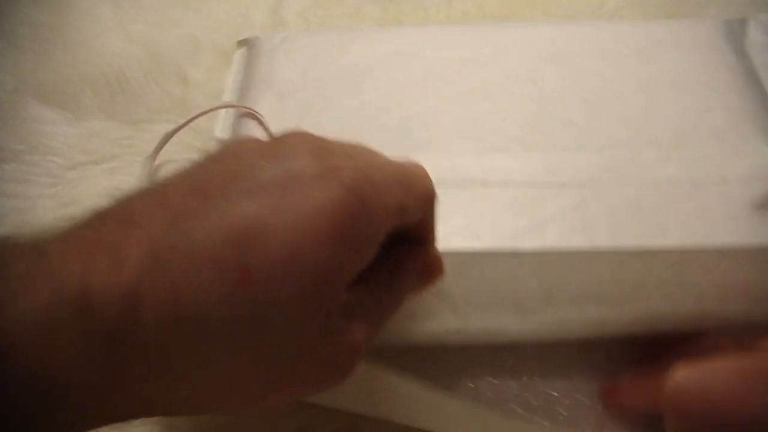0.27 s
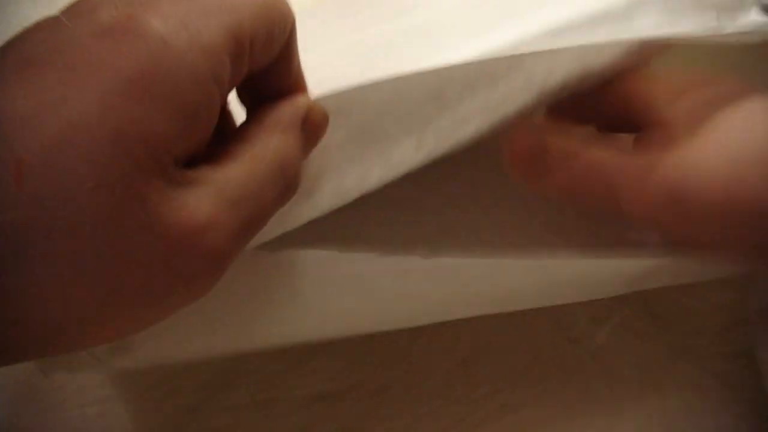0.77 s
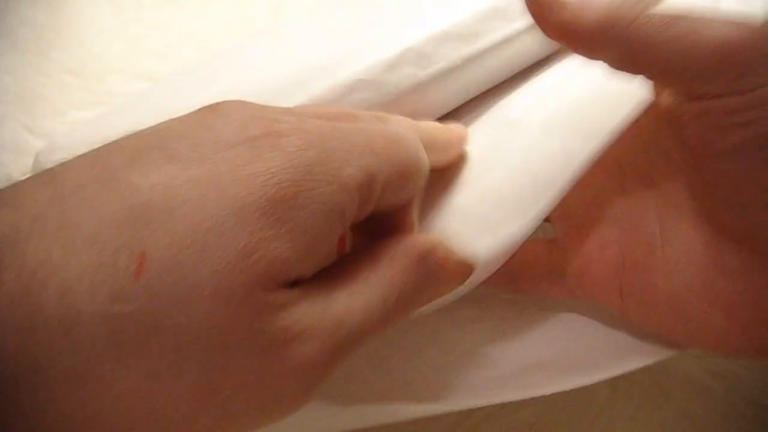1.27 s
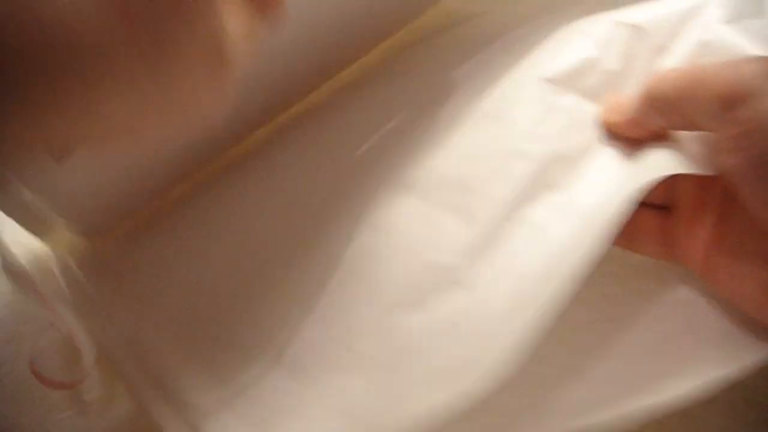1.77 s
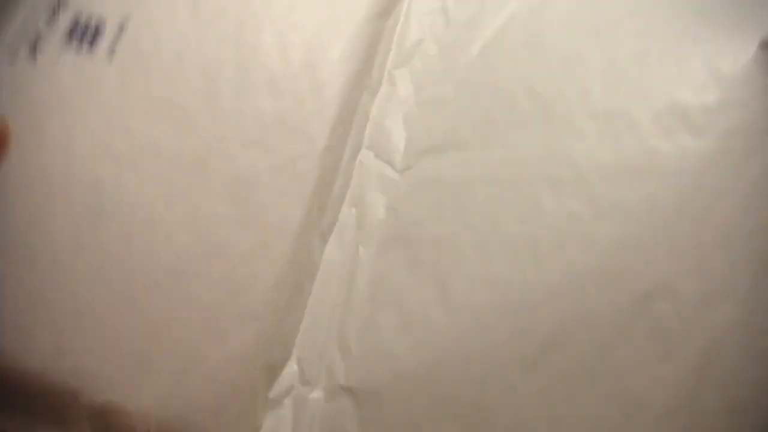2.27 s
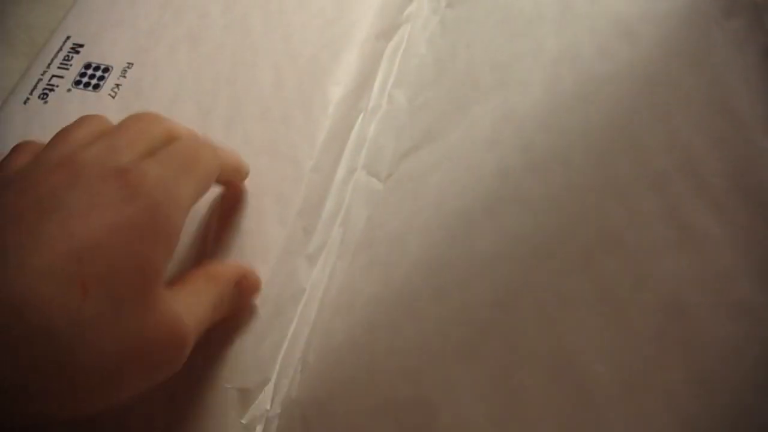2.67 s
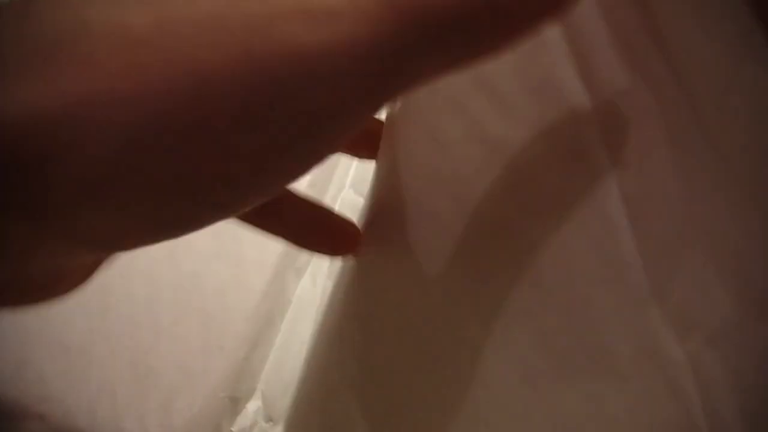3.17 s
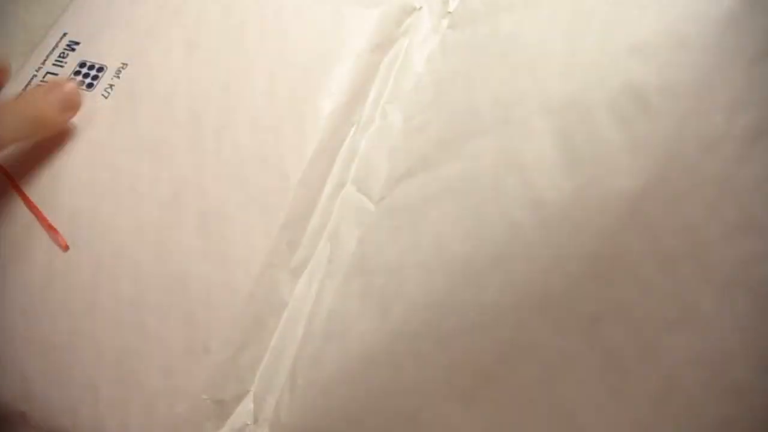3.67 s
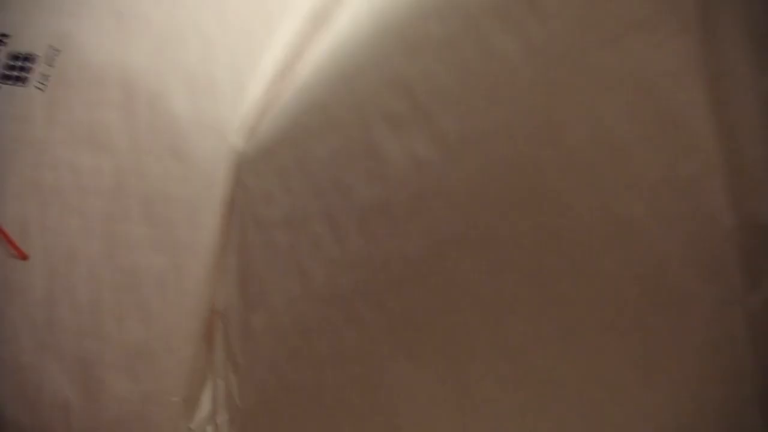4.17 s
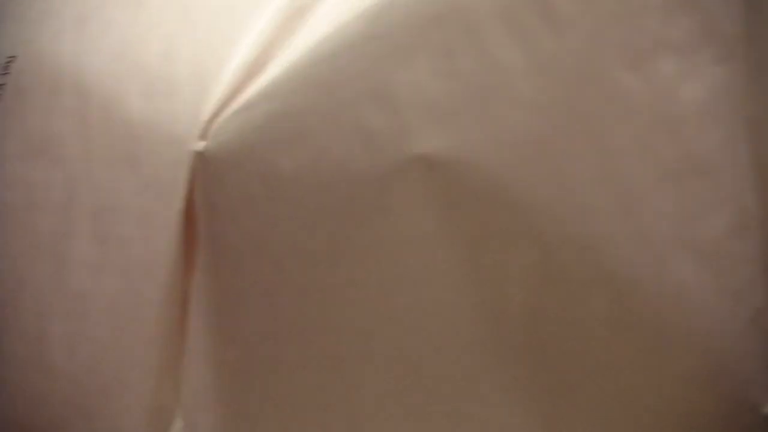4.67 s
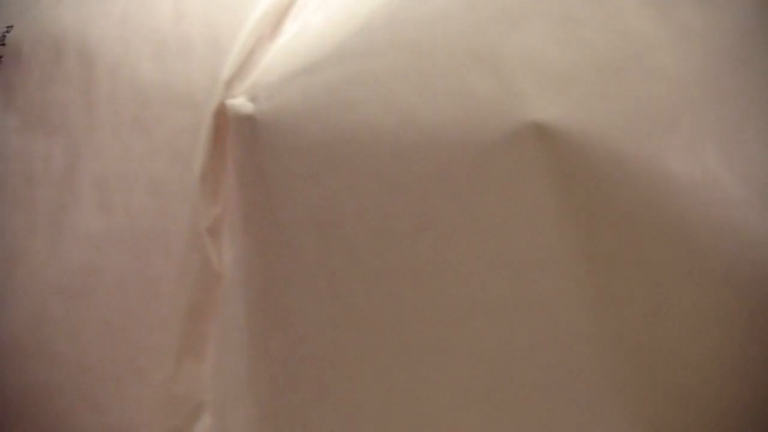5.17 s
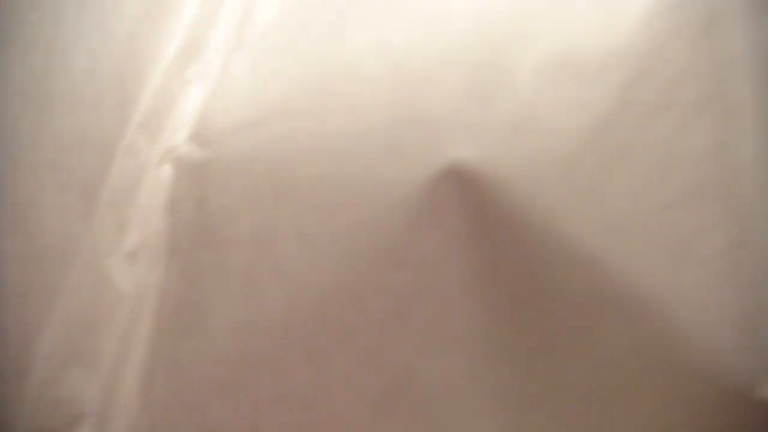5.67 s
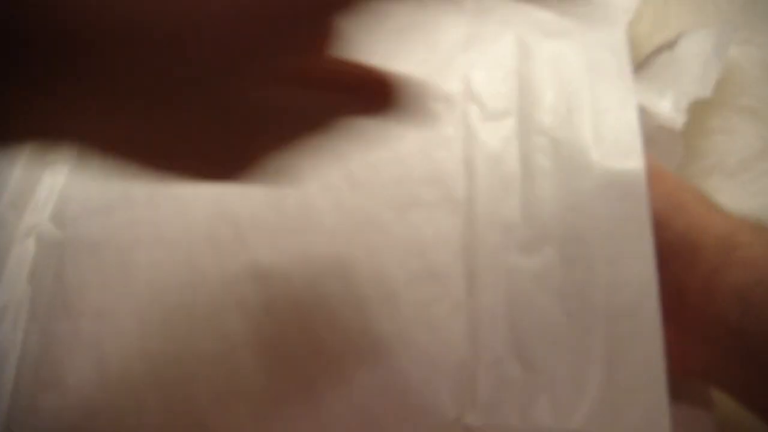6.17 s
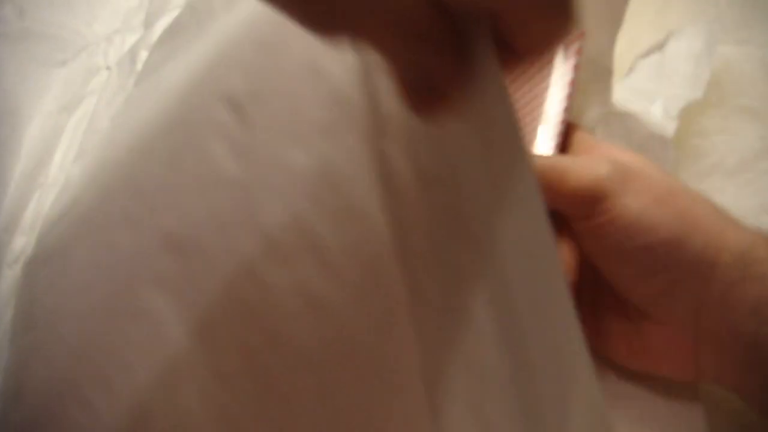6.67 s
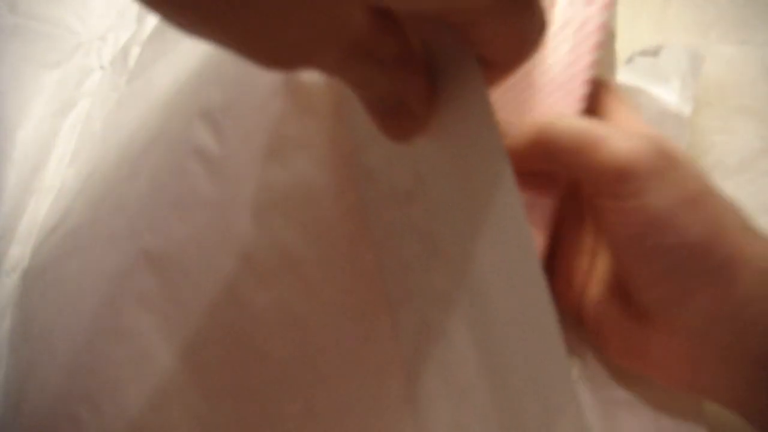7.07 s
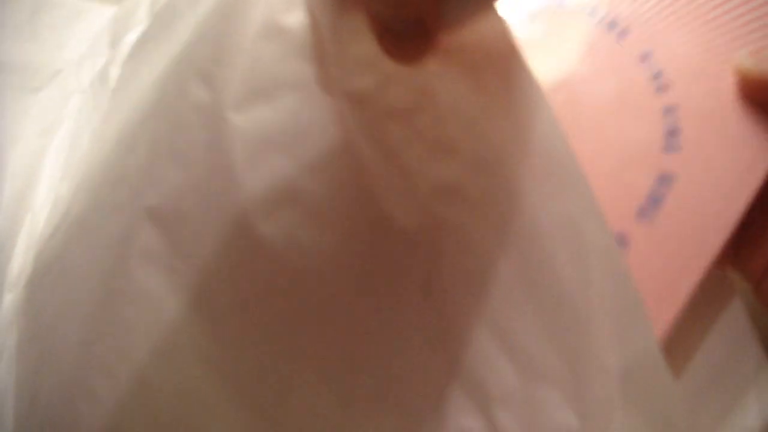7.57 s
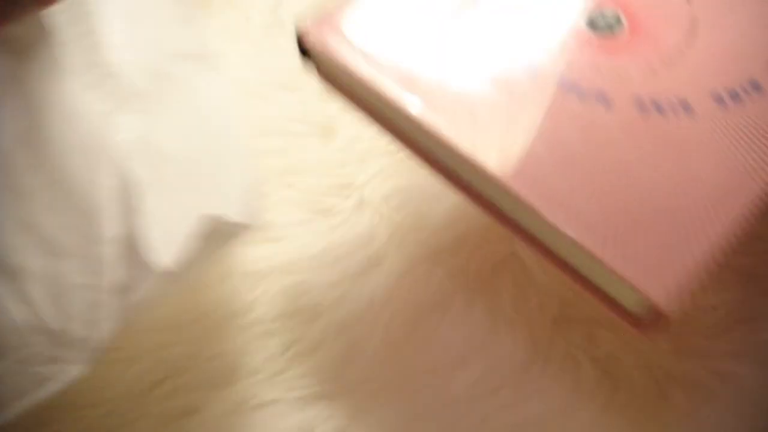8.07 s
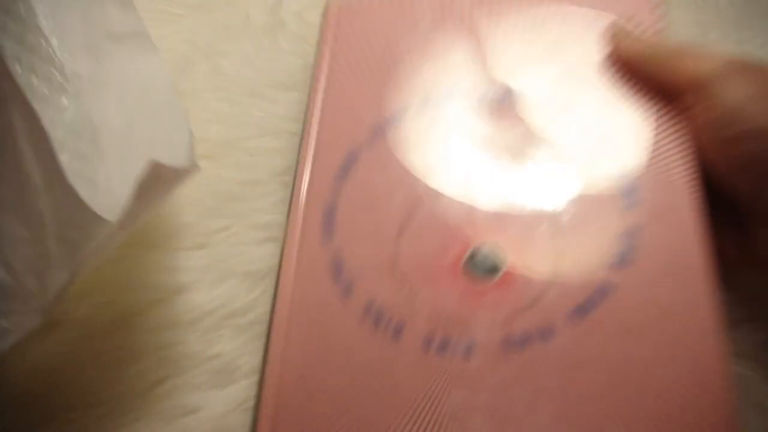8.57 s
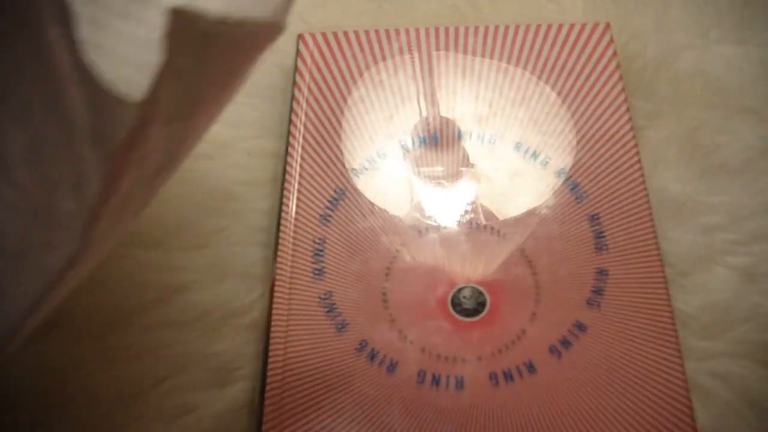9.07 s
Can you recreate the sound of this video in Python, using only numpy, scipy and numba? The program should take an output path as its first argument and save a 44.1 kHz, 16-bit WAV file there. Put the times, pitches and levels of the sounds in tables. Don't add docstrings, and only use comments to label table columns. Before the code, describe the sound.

Hands tear open and empty a padded paper envelope very close to the microphone, loud sharp crackles over dense crinkling, then near silence.

```python
import sys
import numpy as np
from scipy import signal
from scipy.fft import rfft, irfft
from scipy.io import wavfile
from scipy.ndimage import uniform_filter1d
from numba import njit

SR = 44100
rng = np.random.default_rng(int(sys.argv[2]) if len(sys.argv) > 2 else 0)


def dump(signal):
    limited = np.clip(np.atleast_2d(signal).T, -1, 1)
    pcm = np.round(limited * 32767).astype(np.int16)
    wavfile.write(sys.argv[1], SR, pcm)


def linear_from_db(decibels):
    return 10 ** (np.asarray(decibels, float) / 20)


N = 411894

# time in seconds, crinkle level in dB.
REST = [(0, -21.5), (.67, -26), (1.26, -29), (1.5, -28), (2.2, -26.5), (2.72, -30), (3.2, -25.5),
        (4.86, -25), (5.19, -27), (5.42, -19), (5.9, -18.5), (5.99, -33), (6.4, -40), (7.0, -36.5),
        (7.3, -25), (7.9, -25.5), (7.97, -40), (9.34, -41.5)]
REST_PANEL_DB, REST_FLAP_DB = -11, -26
# start in seconds, held for seconds, crinkle level in dB, panels minus crinkle in dB.
GRIPS = [(.1, 0.016, -18, -9), (.3, .27, -27, -13), (.62, 0.0054, -23.5, -15), (.71, 0.23, -21.5, -13.5),
         (0.898, 0.17, -21, -10.5), (1.203, 0.011, -21, -6.5), (1.39, 0.0068, -16.5, -8.5),
         (1.52, 0.076, -30.5, -4), (1.93, 0.14, -23.5, -7.5), (2.35, .25, -26.5, -11.5),
         (2.901, 0.028, -15.5, -9.5), (3.04, 0.06, -17.5, -11), (3.35, 0.27, -22.5, -6),
         (3.9, 0.0082, -19, -9.5), (4.14, 0.089, -19.5, -10.5), (4.35, .4, -22.5, -11),
         (5.02, 0.0036, -18.5, -10), (5.35, 0.013, -17, -9), (5.47, 0.15, -29, 1.5), (6.1, 0.025, -29, -9),
         (6.551, 0.022, -19.5, -8.5), (6.67, 0.035, -16.5, -9.5), (6.8, 0.11, -27, -20),
         (7.12, 0.013, -22.5, -9), (7.27, 0.18, -23, -4), (7.679, 0.0034, -20, -8), (8.07, 0.22, -36, -9),
         (8.66, 0.0082, -39.5, -4), (9.03, 0.039, -44, -4)]
GRIP_RISE_DB_S, GRIP_FALL_DB_S = 135, 147
# start in seconds, held for seconds, level in dB.
FLAPS = [(.12, 0.086, -41.5), (.81, 0.35, -39.5), (1.38, 0.055, -34), (1.89, 0.074, -55),
         (2.57, 0.0085, -38), (2.86, 0.07, -37.5), (3.1, 0.44, -42.5), (3.56, 0.035, -38), (4.04, .02, -45),
         (4.44, .02, -38.5), (4.6, 0.45, -50), (5.35, 0.45, -32.5), (6.56, 0.19, -39.5), (7.3, 0.19, -35.5),
         (7.7, 0.02, -37.5)]
FLAP_RISE_DB_S, FLAP_FALL_DB_S = 106, 114
# start in seconds, length in seconds, level change in dB.
PAUSES = [
    (1.223, 0.069, -7.5),
    (1.453, 0.027, -6.5),
    (5.173, 0.064, -5.5),
    (2.965, 0.051, -5.5),
]
PAUSE_EDGE_S = 0.004

# lowest frequency in Hz, highest frequency in Hz.
BANDS = [(2500, 14500), (500, 2500), (40, 500)]
# frequency in Hz, density in dB per Hz.
PAPER = [(50, -6.5), (150, -9), (400, 2.5), (550, -14.5), (800, -11.5), (1500, -8.5), (3000, -5),
         (6000, -3.5), (10000, -2.5), (14500, -8)]

# time in
# seconds, crack level in dB, strongest panel in Hz.
CRACKS = [(.146, 4.5, 3050), (.2483, 7.5, 6380), (.3322, 4, 2476), (.5836, .5, 8000), (.6852, -19, 7600),
          (.8066, 4, 10800), (.963, 1, 9700), (1.2785, 1, 4000), (1.3557, 1, 2840), (1.3826, 5, 4500),
          (1.4955, -4.5, 4500), (1.6484, 2, 3950), (1.801, -1.5, 3500), (2.8922, 0, 3470),
          (3.047, 5.5, 4700), (1.3423, -2, 6230), (4.4917, -2.5, 4530), (5.3505, 2.5, 3400),
          (5.4575, 8.5, 3050), (5.485, 4.5, 3060), (5.5366, 3.5, 1880), (5.6226, 6.5, 2510),
          (5.748, 3, 4570), (5.8645, -2, 3330), (6.8643, -3.5, 7160), (7.2209, 2.5, 4060),
          (7.349, 8.5, 7200), (7.481, 5, 2480), (7.5022, -16, 824), (8.7135, -9.5, 10300)]
# time in seconds, crack level
# in dB, strongest panel in Hz.
FOLDS = [(.8819, 1.5, 3480), (1.0868, 4.5, 6330), (2.4533, -2, 2840), (2.573, 0.5, 4150),
         (2.602, 9.5, 1170), (2.8042, 6, 1250), (3.1592, -15, 3350), (3.2146, -4.5, 3400), (3.5647, 4, 760),
         (4.146, -5, 3530), (4.428, 4.5, 910), (4.7472, 4, 1570), (4.9057, 4.5, 5700), (5.0214, 7, 5100),
         (5.2445, -3.5, 3380), (5.6424, -1, 2850), (5.7075, 4, 1250), (5.8873, 4, 2170), (6.4965, 4, 3670),
         (6.5414, 5, 2050), (6.7518, 6.5, 870), (6.9275, -3, 2600), (7.258, 3.5, 3700), (7.2902, 5.5, 1310),
         (7.4306, 2.5, 5140), (7.445, 3, 810)]
# time in seconds, crack level in dB, strongest panel in Hz.
POPS_OPENING = [(.0184, -18, 10300), (.1277, 6, 2430), (.3872, 9.5, 3550), (.4528, -4, 1860),
                (.5474, -5, 4930), (.792, -0.5, 1260), (.9213, 1, 2850), (1.0168, 4.5, 7900),
                (1.2076, 6.5, 2450), (1.4284, -1, 2480), (1.4402, 5.5, 3100), (1.5565, -1.5, 1230),
                (1.896, -1.5, 1480), (1.9523, .5, 1780), (2.0898, -5.5, 3050), (2.478, 4.5, 1980),
                (3.0957, 3.5, 2730), (3.1825, 2, 2030), (3.2737, 1, 4870), (3.3465, 2, 5700),
                (3.4071, -1.5, 1890), (3.6091, -1.5, 1058), (4.0099, 8, 2170), (4.0588, -6.5, 860),
                (4.0713, 2, 1990), (4.152, 4, 2100), (4.336, 1, 3900)]
# time in seconds, crack level in dB, strongest panel in Hz.
POPS_EMPTYING = [(5.01, 6.5, 2460), (5.0988, 0, 3570), (5.2712, 1.5, 2200), (5.7291, -2, 1590),
                 (5.8276, 5, 2730), (5.905, 2.5, 2330), (6.377, -18, 7500), (6.4317, -19, 1580),
                 (6.4481, -9.5, 2470), (6.6371, 1.5, 1330), (6.67, 2, 2320), (6.6819, 4.5, 6570),
                 (6.7155, 5.5, 1230), (6.855, -7.5, 1380), (7.0055, -4.5, 3100), (7.0963, 0, 2080),
                 (7.2123, 5, 4440), (7.35, -1, 1360), (7.3817, 0, 1270), (7.4058, 5, 1700),
                 (7.5229, 0, 930), (7.5338, 1.5, 2430), (7.572, 4, 1180), (7.6828, 2, 2480),
                 (7.7053, -2.5, 2600), (7.827, -10, 1850), (7.8994, -10, 1410), (8.356, -10, 6740)]
CRACK_PANEL_DB, FOLD_PANEL_DB, POP_PANEL_DB = -7.5, -5.5, 1

# time in seconds, level in dB, leading panel in Hz.
TICKS = [(0.094, -6, 2650), (0.195, -12.5, 670), (0.261, -4.5, 2600), (0.621, -12.5, 1430),
         (0.817, -4, 4970), (0.937, -8, 9600), (1.042, -8, 9560), (1.292, -10, 4500), (1.303, -5, 4160),
         (1.363, -8, 2900), (1.399, 6.5, 8790), (1.85, -19, 666), (1.965, -2.5, 6100), (2.066, -15, 1270),
         (2.856, -8.5, 1340), (2.896, 1.5, 3530), (3.058, -3, 2960), (2.31, -18.5, 1240), (3.318, -16, 775),
         (4.076, -2, 3570), (4.691, -11, 8900), (4.765, -9, 1720),
         (5.092, -9.5, 2620), (5.367, -13, 830), (5.38, -4.5, 3440), (5.458, -15, 2920),
              (5.623, 2, 7300), (5.756, -2, 4800), (6.138, -23, 1380), (6.555, -7, 1880),
              (6.689, -13, 6740), (6.775, -10.5, 795), (7.128, -15.5, 1150), (7.272, -9.5, 1480),
              (7.36, -8, 1300), (7.398, -9, 1160), (7.727, -6.5, 2580), (8.93, -37, 1400),
         (0.737, -12.5, 1800),
    (0.763, -13, 1160),
    (4.269, -18, 1690),
    (4.652, -15.5, 756),
    (5.079, -14, 805),
    (8.046, -29.5, 840),
    (8.263, -34, 1030),
    (8.607, -36, 796),
    (8.673, -32, 2640),
]
# time in seconds, level in dB, pitch in Hz.
THUMPS = [(0.1, -24, 265), (0.788, -26.5, 264), (0.967, -36, 119.5), (1.206, -30.5, 122), (1.432, -32, 280),
          (2.47, -28, 254), (2.608, -21, 277), (2.917, -38, 72.7), (3.555, -23, 234), (4.001, -38, 231),
          (4.451, -35, 140), (5.36, -27, 229), (6.674, -35, 272), (7.666, -20, 263), (7.807, -33, 201)]
# start in seconds, number of ticks, first rate per second,
# last rate per second, unevenness from 0 to 1, panel in Hz, level in dB.
ZIPS = [
    (.686, 14, 290, 290, .2, 7900, -8),
    (1.581, 5, 76, 88, .01, 3800, -6),
    (1.651, 8, 98, 128, .02, 3800, -8),
]

# time in seconds, resonance level in dB.
POCKET = [
    (0, -18),
    (3.4, -14),
    (4.4, 1),
    (5.2, -21),
    (5.4, 5.5),
    (5.9, 0),
    (6.8, -17),
    (7.6, 0.5),
    (9.34, -12.5),
]
POCKET_HZ, POCKET_WIDTH_HZ = 820, 190
ROOM_T60_S, ROOM_DB, ROOM_DULL_HZ = 0.058, -12.5, 6530
MOTOR_HZ, MOTOR_DB = 1030, -60

# frequency in Hz, phase in radians.
PORT_LEAD = [(0, 0), (4000, -.1), (8000, -.9), (10300, -1.2), (14700, -2.8)]
# frequency in Hz, side gain in dB.
PORT_WIDTH = [(100, -13), (700, -14), (1500, -22.5), (2500, -10.5), (4000, -7), (6000, 1), (14000, 5)]
# frequency in Hz, left minus right in dB.
PORT_TILT = [(60, 4), (110, 0), (690, .8), (1270, 0), (4290, 0.3), (7900, 1.5), (14500, 5.5)]
# frequency in Hz, density in dB per Hz.
HISS = [(25, 3), (100, -0.5), (400, 2), (1400, -7), (2500, -10), (6000, -52), (14500, -21)]
HISS_DB, TOP_HZ = -53, 14170


def read(table, hz):
    f, v = np.transpose(table)
    return np.interp(np.log(hz + 20), np.log(f + 20), v)


def unit(x):
    return x / np.sqrt(np.mean(x ** 2))


def above(x, hz):
    return signal.sosfilt(signal.butter(2, hz, "high", fs=SR, output="sos"), x)


def colour(x, db, turn=0., lo_hz=0., hi_hz=SR):
    hz = np.fft.rfftfreq(N, 1 / SR)
    inside = (hz >= lo_hz) * (hz < hi_hz)
    return irfft(rfft(x) * linear_from_db(db) * np.exp(1j * turn) * inside, N)


def walk(rate):
    k = int(SR / rate)
    held = np.repeat(rng.standard_normal(N // k + 1), k)
    return 1.165 * uniform_filter1d(uniform_filter1d(held, k), k)[:N]


@njit
def rings(s, hz, t60, size, lag, rise):
    out = np.zeros((2, N))
    settle = np.exp(-1 / (rise * SR))
    for k in range(len(s)):
        step = np.exp((2j * np.pi * hz[k] - np.log(1000) / t60[k]) / SR)
        late = np.exp(-2j * np.pi * hz[k] * lag[k])
        z = size[k] + 0j
        start = int(s[k] * SR)
        unrisen = 1.
        for j in range(max(start, 0), min(start + int(t60[k] * SR * .8) + 2, N)):
            unrisen *= settle
            out[0, j] += z.imag * (1 - unrisen)
            out[1, j] += (z * late).imag * (1 - unrisen)
            z *= step
    return out


def swells(s, held, db, rise_db_s, fall_db_s):
    t = np.arange(0, N, 64) / SR
    power = 0
    for at, hold, top in zip(s, held, db):
        rise_db = rise_db_s * np.maximum(at - t, 0)
        fall_db = fall_db_s * np.maximum(t - at - hold, 0)
        power = power + linear_from_db(top - rise_db - fall_db) ** 2
    return np.interp(np.arange(N) / SR, t, power)


def hands():
    t = np.arange(N) / SR
    rest = linear_from_db(np.interp(t, *np.transpose(REST))) ** 2
    s, held, db, panel_db = np.transpose(GRIPS)
    fine = rest + swells(s, held, db, GRIP_RISE_DB_S, GRIP_FALL_DB_S)
    panel = rest * linear_from_db(2 * REST_PANEL_DB) + swells(s, held, db + panel_db, GRIP_RISE_DB_S, GRIP_FALL_DB_S)
    flap = rest * linear_from_db(2 * REST_FLAP_DB) + swells(*np.transpose(FLAPS), FLAP_RISE_DB_S, FLAP_FALL_DB_S)
    hush_db = 0
    for at, length, pause_db in PAUSES:
        to_edge = np.minimum(t - at, at + length - t)
        hush_db = hush_db + pause_db * np.clip(to_edge / PAUSE_EDGE_S, 0, 1)
    return np.sqrt([fine, panel, flap]) * linear_from_db(hush_db)


def rubbing(clump, lo_hz, hi_hz):
    hz = np.fft.rfftfreq(N, 1 / SR)
    own = np.clip(hz / 16000, 0, .95)
    mid, side = rfft(rng.standard_normal((2, N)))
    noise = irfft(mid + own * side * np.array([[1], [-1]]), N)
    return linear_from_db(1.26 * clump) * colour(noise, read(PAPER, hz), lo_hz=lo_hz, hi_hz=hi_hz)


def crinkle(place, count=4000, scatter_db=1.5, spread_s=.002, cycles=(16, 10, 3), rub_db=(1.5, -4, -2)):
    s = np.sort(rng.random(count)) * N / SR
    at = (s * SR).astype(int)
    clump = 1.9 * walk(80) + .4 * walk(30)
    size = linear_from_db(scatter_db * np.minimum(rng.exponential(size=count), 3.) + clump[at])
    lag = place[at] + 8e-6 * rng.standard_normal(count)
    layers = []
    for (lo, hi), turns, db, panels in zip(BANDS, cycles, rub_db, (4, 2, 1)):
        pitch, delay, push = rng.random((3, panels, count))
        pitch[0] = (0.372 * walk(15)[at] + 0.11 * pitch[0]) % 1
        hz = lo * (hi / lo) ** pitch
        gain = size * hz * linear_from_db(read(PAPER, hz)) * (push - .5)
        late = s + spread_s * delay ** 2
        grains = rings(late.ravel(), hz.ravel(), (turns / hz).ravel(), gain.ravel(),
                       np.tile(lag, panels), 0.27 / hi)
        grains = unit(above(grains, 0.61 * lo))
        layers.append(unit(grains + linear_from_db(db) * unit(rubbing(clump, lo, hi))))
    return layers


def snaps(place, count=24, main_db=1.3, rest_db=-5, steps_s=.003, ring_s=0.0035, rise_s=0.00031):
    kinds = (CRACKS, CRACK_PANEL_DB), (FOLDS, FOLD_PANEL_DB), (POPS_OPENING, POP_PANEL_DB), (POPS_EMPTYING, POP_PANEL_DB)
    events = [(*row, db) for rows, db in kinds for row in rows]
    s, crack_db, main_hz, panel_db = np.array(events).T[:, :, None]
    u = rng.random((len(s), 3, count))
    weak_hz = 750 * (14000 / 750) ** ((np.arange(count) + u[:, 0]) / count) ** 0.534
    hz = np.hstack([main_hz, weak_hz])
    large_db = np.where(hz < 2500, panel_db, 0)
    rank_db = np.r_[main_db, np.full(count, rest_db)]
    late = 0.00066 + np.hstack([0 * s, steps_s * u[:, 1] ** 1.4])
    ring = np.clip(ring_s, 5.65 / hz, 45 / hz)
    sign = np.hstack([1 + 0 * s, np.cos(2 * np.pi * u[:, 2])])
    stirred = np.sqrt(np.minimum(hz / 1700, 1))
    size = sign * linear_from_db(crack_db + large_db + rank_db) * stirred
    lag = place[(s * SR).astype(int)] + 0 * hz
    return above(rings((s + late).ravel(), hz.ravel(), ring.ravel(), size.ravel(), lag.ravel(), rise_s), 178)


def ticks(place, count=9, width_oct=0.764, main_db=4, rest_db=-1, steps_s=0.0051, cycles=18):
    s, db, main_hz = np.array(TICKS).T[:, :, None]
    r = rng.random((len(s), 3, count))
    octaves = np.hstack([0 * s, width_oct * (4 * r[:, 0] - 1.5)])
    hz = np.clip(main_hz * 2 ** octaves, 400, 14000)
    late = np.hstack([0 * s, steps_s * r[:, 1] ** 2])
    ring = np.minimum(cycles / hz, .012)
    size = linear_from_db(db) * np.hstack([linear_from_db(main_db) + 0 * s, linear_from_db(rest_db) * np.cos(2 * np.pi * r[:, 2])])
    lag = place[(s * SR).astype(int)] + 0 * hz
    return above(rings((s + late).ravel(), hz.ravel(), ring.ravel(), size.ravel(), lag.ravel(), 0.00037), 350)


def thumps(cycles=5):
    s, db, hz = np.transpose(THUMPS)
    return rings(s, hz, cycles / hz, linear_from_db(db + 11.5), 0 * s, 0.0012)


def zips(place, scatter_db=1.5, cycles=22, fade_db=-5, rise_s=.0002):
    ratios, ratios_db = (1, 2.1, .72, 2.8, 1.5, 3.4), (0, 8, -5, 7, -2, 4)
    out = 0
    for start, count, first, last, jitter, hz, db in ZIPS:
        count = int(count)
        r = rng.standard_normal((count, 14))
        s = start + np.cumsum((1 + jitter * r[:, 0]) / np.linspace(first, last, count))
        lag = place[(s * SR).astype(int)]
        tick_db = db + scatter_db * r[:, 1] + np.linspace(0, fade_db, count)
        for k in range(6):
            panel = np.clip(hz * ratios[k] * (1 + 0.052 * r[:, 2 + k]), 300, 14000)
            size = linear_from_db(tick_db + ratios_db[k]) * np.sign(r[:, 8 + k])
            out = out + rings(s + 0.0001 * k, panel, cycles / panel, size, lag, rise_s)
    return out


def pocket(paper):
    t = np.arange(N) / SR
    air = signal.lfilter(*signal.iirpeak(POCKET_HZ, POCKET_HZ / POCKET_WIDTH_HZ, SR), paper)
    return linear_from_db(np.interp(t, *np.transpose(POCKET))) * air


def room(x):
    t = np.arange(int(.4 * SR)) / SR
    tail = rng.standard_normal((2, len(t))) * linear_from_db(-60 * t / ROOM_T60_S) * (t > .003)
    tail = signal.lfilter(*signal.butter(1, ROOM_DULL_HZ, fs=SR), tail)
    tail = tail / np.sqrt((tail ** 2).sum(1, keepdims=True))
    return linear_from_db(ROOM_DB) * signal.fftconvolve(x, tail, axes=1)[:, :N]


def motor():
    return linear_from_db(MOTOR_DB) * np.sin(2 * np.pi * MOTOR_HZ * np.arange(N) / SR)


def scene():
    place = 14e-6 * walk(5.5)
    bed = sum(gain * layer for gain, layer in zip(hands(), crinkle(place)))
    paper = bed + snaps(place) + ticks(place) + thumps() + zips(place)
    paper = paper + pocket(paper)
    return paper + room(paper) + motor()


def low_pass(x):
    return signal.sosfilt(signal.butter(12, 15140, fs=SR, output="sos"), x)


def record(dry):
    hz = np.fft.rfftfreq(N, 1 / SR)
    half = np.array([[1], [-1]]) / 2
    mid = dry.sum(0)
    side = colour(dry[0] - dry[1], read(PORT_WIDTH, hz))
    lead = np.interp(hz, *np.transpose(PORT_LEAD))
    ports = colour(mid / 2 + half * side, half * read(PORT_TILT, hz), half * lead)
    hiss = linear_from_db(HISS_DB) * unit(colour(rng.standard_normal((2, N)), read(HISS, hz)))
    top_db = np.where(hz > TOP_HZ, -14 - (hz - TOP_HZ) / 15, 0)
    mix = colour(above(ports, 47) + hiss, top_db)
    return low_pass(np.clip(mix, -1, 1))


dry = scene()
out = record(dry)
dump(out)
```